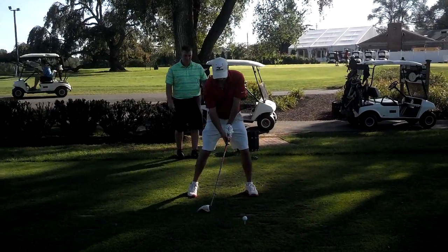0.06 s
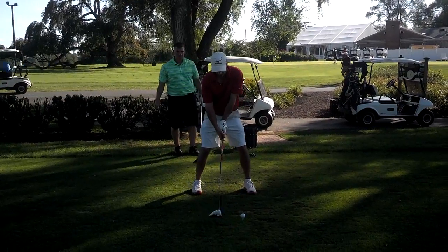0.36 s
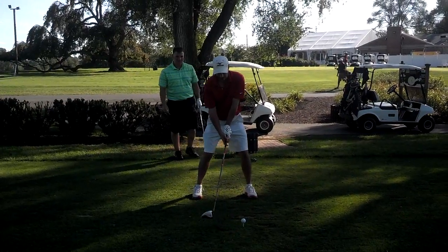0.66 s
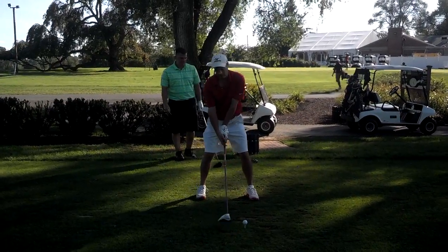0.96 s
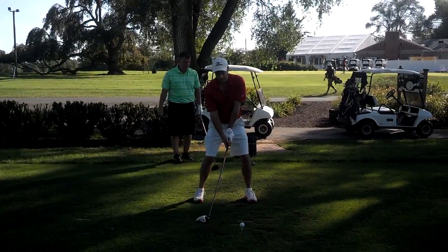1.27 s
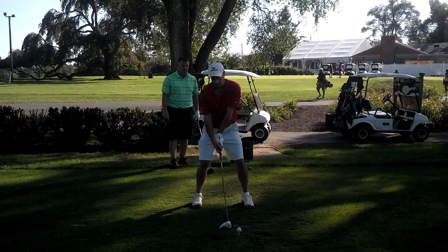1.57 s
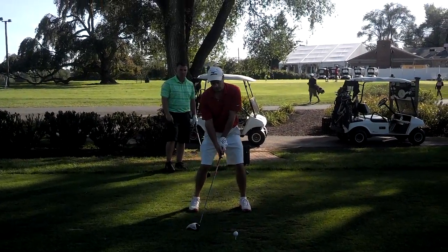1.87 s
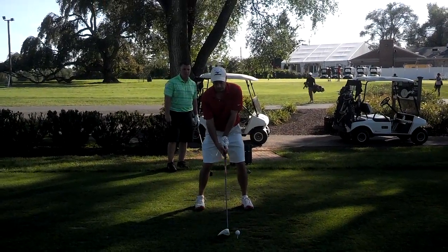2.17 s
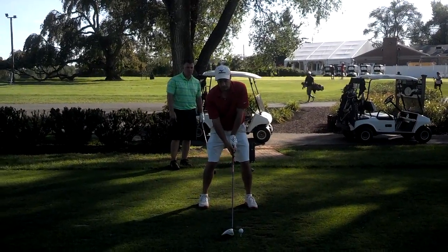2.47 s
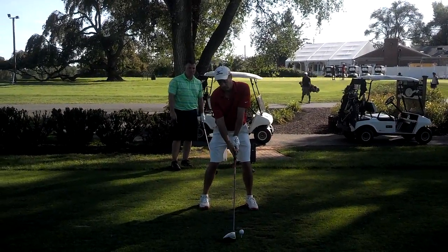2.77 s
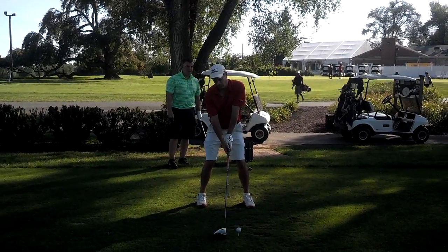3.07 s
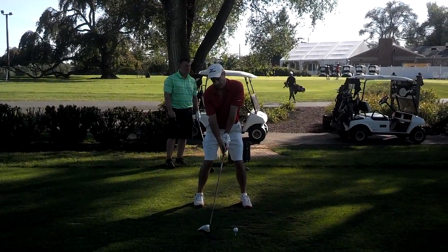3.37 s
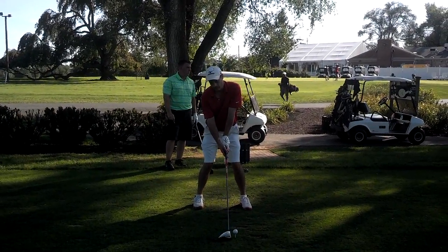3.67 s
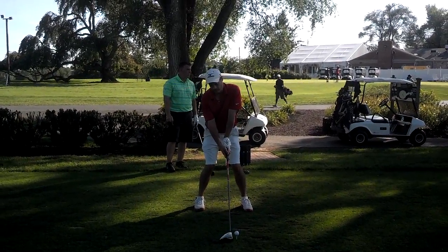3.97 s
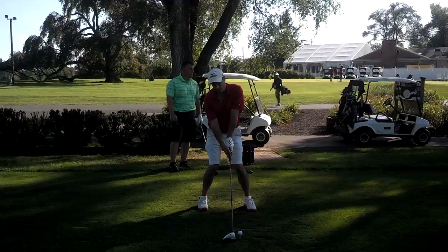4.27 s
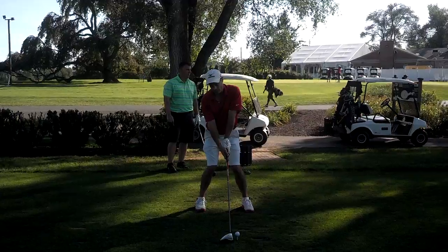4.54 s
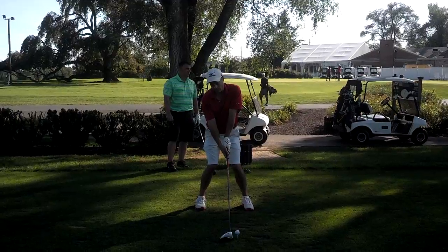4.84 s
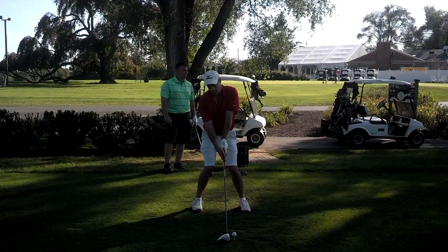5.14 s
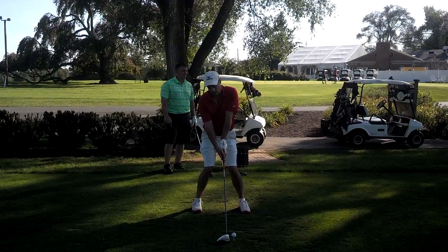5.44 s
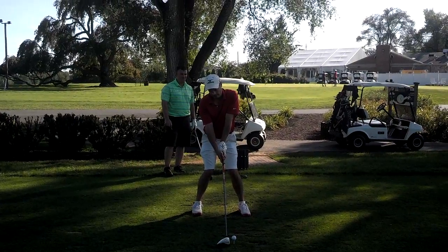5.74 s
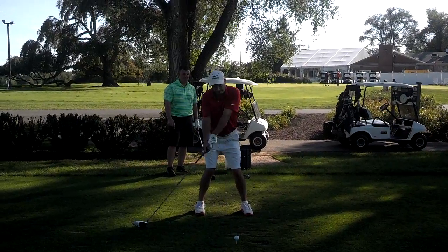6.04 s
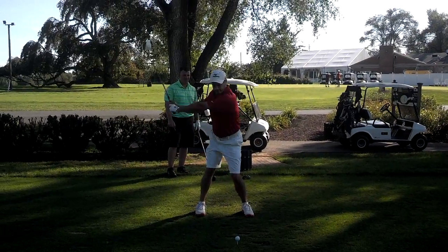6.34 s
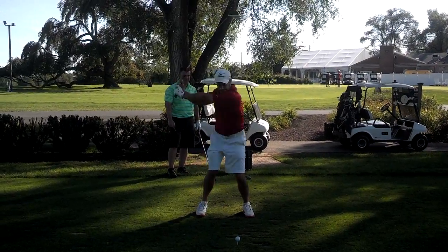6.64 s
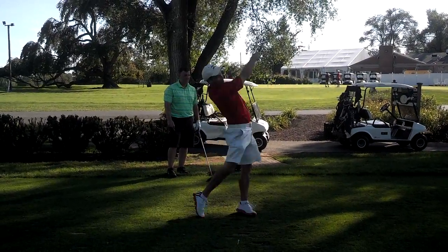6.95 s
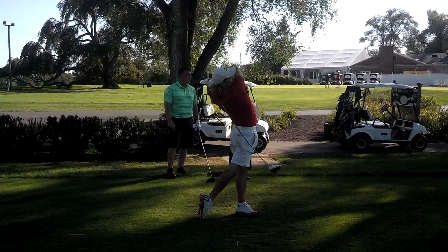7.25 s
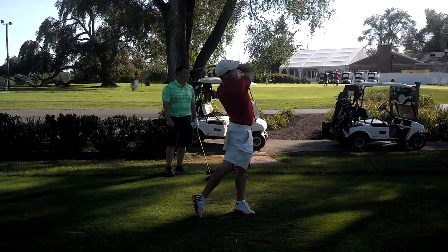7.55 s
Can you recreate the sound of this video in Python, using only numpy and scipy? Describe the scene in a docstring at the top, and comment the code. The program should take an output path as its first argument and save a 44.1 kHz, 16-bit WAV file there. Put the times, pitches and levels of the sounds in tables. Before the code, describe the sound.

Cicadas buzz over a distant mower, then a golf club whooshes and hits the ball with a loud, ringing metallic crack.

```python
"""Drive from a tree-lined tee

A golfer brushes the grass and swings: the shaft whistles, the hollow metal head cracks and rings,
and the trees answer. Cicadas buzz overhead on a bed of far roads and a droning mower, while a cart
rolls off to the left. A sharp tick, and later the strike, duck the mix, which then creeps back up."""
import sys
import numpy as np
from scipy import signal
from scipy.fft import rfft, irfft, next_fast_len
from scipy.io import wavfile
from scipy.ndimage import map_coordinates

SR = 44100
rng = np.random.default_rng(int(sys.argv[2]) if len(sys.argv) > 2 else 0)


def generate_wav(signal):
    """Clip the signal to [-1, 1] and save it as 16-bit WAV at the path in sys.argv[1]."""
    frames = np.transpose(np.atleast_2d(signal))
    scaled = np.clip(frames, -1, 1) * 32767
    pcm = np.round(scaled).astype(np.int16)
    wavfile.write(sys.argv[1], SR, pcm)


N = 335601
TIME = np.arange(N) / SR

# Road murmur, centre and sides of the image. Each row: frequency in Hz, relative level in dB.
ROADS_MID = [(25, -85), (55, -79), (78, -62), (92, -66.5), (125, -54), (200, -59), (280, -64.5),
             (430, -79.5), (680, -74.5), (1150, -82.5), (1700, -88), (2200, -83), (2850, -93), (3200, -87),
             (3800, -90), (10000, -100), (15000, -100)]
ROADS_SIDE = [(25, -103), (60, -94.5), (120, -76), (300, -90.5), (520, -81.5), (1000, -82), (1700, -82.5),
              (2200, -92.5), (2950, -94), (3450, -82.5), (10000, -103), (15000, -99)]
# The mower's tones beside its engine note. Each row: pitch in Hz, level in dB, flutters per second.
MOWER_TONES = [(149.5, -42.7, 4), (1613, -72, 5)]
# The dull roar of its blades. Each row: frequency in Hz, relative level in dB.
BLADE_ROAR = [(100, -81), (200, -66), (330, -70.5), (450, -78), (700, -93), (2000, -120)]
# The cart's tyres and drive. Each row: frequency in Hz, relative level in dB.
CART_ROLL = [(60, -96), (150, -70), (300, -71), (420, -77), (650, -71.8), (1000, -91), (1500, -84),
             (2100, -79.5), (3000, -104.5), (6000, -110)]
# Their fade as the cart leaves. Each row: time in seconds, gain in dB.
CART_FADE = [(0, .5), (3, -2.5), (4.3, -14.5), (6.3, -14.5), (7.6, -21)]
# Cicada body resonances, upper and lower. Each row: centre in Hz, half-width in Hz, relative level in dB.
HIGH_BODY = [(5770, 70, -5), (6020, 140, -5.5), (6350, 110, -10), (6655, 150, 2), (7030, 90, -1.5),
             (7555, 150, .5), (8150, 470, -5)]
LOW_BODY = [(4030, 65, -1), (4485, 105, 0), (4880, 140, 0), (5280, 130, 1)]
# The cicada's muscle, slowly tiring. Each row: time in seconds, strokes per second.
STROKE_RATE = [(0, 46.9), (1.5, 46.5), (2.6, 46.35), (4.4, 45.9), (5.4, 45.6), (6.2, 45.7), (7.6, 45.7)]
# The club touching grass. Each row: peak time in seconds, level in dB, fade in and out in seconds.
GRASS_TOUCHES = [(1.031, -46, .006), (2.5, -52, .004), (2.884, -43, .012)]
# The colour of brushed grass. Each row: frequency in Hz, relative level in dB.
GRASS_EQ = [(3000, -40), (8000, -6), (13000, 7.5), (16000, 5.5)]
# The swing's low rush of air and its bright hiss. Each row: frequency in Hz, relative level in dB.
RUSH_EQ = [(80, -12.5), (200, -3.5), (350, -1.5), (620, 9), (1000, 4.5), (1400, -7), (3000, -30)]
HISS_EQ = [(500, -25), (1000, -3), (1400, 0), (2000, -2), (2600, 3), (4000, -13), (9000, -17), (14000, -31)]
# Modes ringing from the strike: the short 2650 Hz row is the ball, the rest the hollow club head. Each row:
# pitch in Hz, relative level in dB, seconds to fall 60 dB.
STRIKE_MODES = [(1857, -6, .007), (2650, -5, .007), (3284, -20, .08), (3390, -23, .05), (3903, -21.5, .08),
                (5330, -21, .09), (5660, -15, .04), (6175, -7, .045), (6480, -12, .04), (6790, -5, .05),
                (7138, -18, .06), (7849, -20, .05), (8027, -17, .05), (8300, -22, .06), (9254, -16, .045),
                (9781, -15, .05), (10800, -26, .06), (12610, -12, .04), (14670, -25, .07), (15450, -17, .05)]
# The crack of face on ball. Each row: frequency in Hz, relative level in dB.
CRACK_EQ = [(60, -13), (300, 2), (900, 0), (1700, 0), (3000, 0), (4200, -2), (5200, 0), (6400, 3.5),
            (8200, -4), (12000, -7), (15000, -2)]
# Slaps off nearby trunks. Each row: delay in seconds, relative level in dB.
TRUNK_SLAPS = [(.021, -36), (.075, -44), (.084, -48), (.105, -49)]
# What bark reflects, and the colour of the trees' tail. Each row: frequency in Hz, relative level in dB.
BARK_EQ = [(100, -6), (2000, -4), (7000, -1), (14000, -13)]
TREE_TAIL_EQ = [(100, -6.5), (500, -2.5), (1500, -5), (4600, -4), (5400, 3.5), (7000, 1.5), (10000, -1),
                (15000, -9)]

FASTEST_S, STRIKE_S = 6.831, 6.8461  # the club reaches top speed, then meets the ball


def amp(db):
    """Decibels as a gain."""
    return 10 ** (np.asarray(db) / 20)


def unit(x):
    """x scaled to an rms of 1."""
    return x / np.sqrt(np.mean(x ** 2) + 1e-20)


def curve(rows):
    """An automation line through (seconds, value) points."""
    return np.interp(TIME, *np.transpose(rows))


def wobble(rate):
    """A smooth random curve, rate knots a second."""
    return map_coordinates(rng.standard_normal(int(N * rate / SR) + 4), [TIME * rate])


def bump(peak_s, width_s):
    """A bell-shaped envelope."""
    return np.exp(-((TIME - peak_s) / width_s) ** 2)


def dying(start, t60):
    """An envelope that opens at start and falls 60 dB in t60 seconds."""
    return (TIME >= start) * np.exp(-np.log(1000) * np.abs(TIME - start) / t60)


def phase(hz):
    """Running angle of a changing frequency."""
    return 2 * np.pi * np.cumsum(hz) / SR


def filtered(x, response):
    """x through a complex frequency response."""
    m = next_fast_len(N + SR // 2)
    return irfft(rfft(x, m) * response(np.fft.rfftfreq(m, 1 / SR)), m)[..., :N]


def coloured(x, eq):
    """x through an EQ of (Hz, dB) points on a log axis."""
    f, db = np.transpose(eq)
    return filtered(x, lambda hz: amp(np.interp(np.log(hz + 1), np.log(f), db)))


def noise(eq):
    """Noise whose density follows (Hz, dB per Hz) points."""
    return coloured(rng.standard_normal(N) * np.sqrt(SR / 2), eq)


def wide_noise(eq):
    """Separate noise left and right, each of rms 1."""
    return np.array([unit(noise(eq)) for side in range(2)])


def whirr(hz, flutter):
    """A fuzzy tone of rms 1 whose strength and phase drift, flutter times a second."""
    drift = wobble(flutter) + 1j * wobble(flutter)
    return unit(np.real(drift * np.exp(1j * phase(hz + np.zeros(N)))))


def panned(x, lead_ms):
    """Pan by arrival time: the left channel leads by lead_ms."""
    return filtered(x, lambda hz: np.exp(np.outer([1, -1], 1j * np.pi * hz * lead_ms / 1000)))


def scattered(x, t60):
    """The diffuse stereo tail that leaves and branches throw back."""
    t = np.arange(SR // 2) / SR
    tail = rng.standard_normal((2, len(t))) * np.exp(-np.log(1000) * t / t60)
    return signal.oaconvolve(x[None], tail / np.linalg.norm(tail[0]), axes=1)[:, :N]


def traffic(gain_db):
    """Far roads murmur from all around."""
    mid, side = noise(ROADS_MID), noise(ROADS_SIDE)
    return np.array([mid + side, mid - side]) * amp(gain_db + 1.1 * wobble(3))


def mower(roar_db, engine_hz=118.6):
    """An engine drone throbs against its own scattered echoes; the blades roar dully from the left."""
    direct = unit(np.sin(phase(engine_hz * (1 + .02 * wobble(20)))))
    echoes = whirr(engine_hz, flutter=16)
    engine = amp(-37.3 + .3 * TIME) * (1.05 * direct + .8 * echoes)  # slowly nearing
    tones = sum(amp(db) * whirr(hz, flutter) for hz, db, flutter in MOWER_TONES)
    blades = noise(BLADE_ROAR) * amp(roar_db)
    return panned(engine + tones, lead_ms=-.03) + panned(blades, lead_ms=.5)


def cart(nearest_s=.12, pass_s=.45, gear_hz=690):
    """The gear whirr sinks and fades as the cart passes; its tyres roll on to the left."""
    along = (TIME - nearest_s) / pass_s
    distance = np.hypot(1, along)
    hz = gear_hz * (1 - .19 * along / distance)
    first_pair = whirr(hz, flutter=230)
    second_pair = amp(-7) * whirr(1.77 * hz, flutter=320)
    gears = (first_pair + second_pair) * amp(-46) / distance ** 2
    tyres = noise(CART_ROLL) * amp(curve(CART_FADE) + .7 * wobble(6))
    return panned(tyres, lead_ms=.22) + gears


def tymbal(body, stroke, click_gap_s, swell_db, rasp, click_width_s=.00003):
    """Each muscle stroke buckles a run of ribs; their clicks ring a body that wavers as it flexes."""
    even_ribs = (stroke - .5) / curve(STROKE_RATE) / click_gap_s
    rib = even_ribs + .004 * even_ribs ** 2  # each rib follows a little sooner than the last
    from_click_s = (rib - np.round(rib)) * click_gap_s
    swell = amp(-swell_db * np.cos(2 * np.pi * stroke))
    clicks = unit(swell * np.exp(-(from_click_s / click_width_s) ** 2))
    leaf_blur = .4 * scattered(clicks, t60=.008)
    grit = rasp * unit(swell * rng.standard_normal((2, N)))
    drive = panned(clicks, lead_ms=.051) + leaf_blur + grit
    resonance = lambda hz, width: filtered(drive, lambda f: 1 / (1 + ((f - hz) / width) ** 2))
    return unit(sum(resonance(hz, width) * amp(db + 1.2 * wobble(7)) for hz, width, db in body))


def cicadas(warm_up_s=1.4):
    """Two tymbals pulse together: the upper buzz grows steadily, the lower one warms up and holds."""
    rate = curve(STROKE_RATE) * (1 + .002 * wobble(20))
    stroke = phase(rate) / (2 * np.pi) % 1
    high = tymbal(HIGH_BODY, stroke, click_gap_s=.001985, swell_db=2.9, rasp=1.45)
    low = tymbal(LOW_BODY, stroke, click_gap_s=.002232, swell_db=3.4, rasp=1.35)
    high_db = -43.3 + .5 * TIME
    low_db = -49.3 - 10 * np.exp(-TIME / warm_up_s)
    return amp(high_db) * high + amp(low_db) * low


def tick(start_s=3.08132):
    """One sharp tick, dead centre: a spike with a brief dull push behind it."""
    return -amp(14) * dying(start_s, t60=.0002) - amp(21.2) * dying(start_s, t60=.0026)


def grass_brushes():
    """The club head grazes the grass as the golfer takes aim."""
    touch = sum(amp(db) * np.exp(-np.abs(TIME - s) / fade) for s, db, fade in GRASS_TOUCHES)
    return touch * wide_noise(GRASS_EQ)


def head_whistle(pass_s=6.818, pass_hz=1700):
    """The head's thin whistle falls as it flies past."""
    hz = pass_hz * (1 - np.clip(6.5 * (TIME - pass_s), -.5, .5))
    return np.sin(phase(hz * (1 + .02 * wobble(200)))) * amp(-38.5) * bump(pass_s, width_s=.012)


def swing(whistle_hz=895, hum_hz=670, beat_hz=96):
    """Vortices shed by the shaft whistle higher as it speeds up, inside a rush of air that brightens."""
    braked = np.where(TIME < STRIKE_S, 1, .75)  # the hit takes a quarter of the speed
    speed = braked / (1 + ((TIME - FASTEST_S) / .072) ** 2)
    swell = lambda db_per_s: braked ** 3 * amp(-db_per_s * np.abs(TIME - FASTEST_S))
    flare = amp(22.5 * bump(6.8085, width_s=.016))  # the whistle's beam sweeps over the listener
    # Vortices from head and shaft beat against each other.
    beats = 1 - .48 * np.cos(2 * np.pi * beat_hz * (TIME - FASTEST_S))
    tone = unit(np.sin(phase(whistle_hz * speed * (1 + .045 * wobble(150)))))
    whistle = tone * flare * beats * amp(-36.3 + 1.5 * wobble(170)) * swell(db_per_s=330)
    head = head_whistle()
    # The thicker upper shaft hums lower.
    hum = whirr(hum_hz * speed, flutter=200) * amp(-32) * bump(6.810, width_s=.032)
    rush = unit(noise(RUSH_EQ)) * amp(-29) * swell(db_per_s=270)
    hiss = unit(noise(HISS_EQ)) * amp(-33) * swell(db_per_s=420)
    return panned(whistle + hum + head + rush + hiss, lead_ms=.068)


def strike_ring():
    """The hollow head's modes, with the ball's brief one, ring from the strike, each wandering a little in
    phase."""
    t = np.arange(SR // 4) / SR
    drift = lambda: .04 * np.cumsum(rng.standard_normal(len(t)))
    ring = sum(amp(db - 60 * t / t60) * np.sin(2 * np.pi * hz * t + drift())
               for hz, db, t60 in STRIKE_MODES)
    return np.pad(ring, (round(STRIKE_S * SR), N))[:N]


def strike(thud_hz=135):
    """The face cracks on the ball with a dull push, the head rings, and turf and trees throw it back."""
    crack = unit(noise(CRACK_EQ)) * dying(STRIKE_S, t60=.0047) * amp(30.5)
    ring = amp(15) * strike_ring()
    thud = amp(9) * dying(STRIKE_S, t60=.04) * np.sin(2 * np.pi * thud_hz * (TIME - STRIKE_S))
    turf = wide_noise(CRACK_EQ) * dying(STRIKE_S, t60=.051) * amp(3)
    slaps = sum(amp(db) * np.roll(crack, round(delay * SR)) for delay, db in TRUNK_SLAPS)
    trunks = coloured(slaps, BARK_EQ)
    trees = wide_noise(TREE_TAIL_EQ) * dying(STRIKE_S + .012, t60=.45) * amp(-19.5 + 1.5 * wobble(100))
    ring_tail = scattered(ring, t60=.4) * amp(-23)
    direct = panned(crack, lead_ms=.085) + panned(ring + thud, lead_ms=.04)
    return direct + turf + trunks + trees + ring_tail


def scene():
    """The bed of the course, with the golfer's aim, swing and strike up front."""
    far_db = .1 - .33 * TIME  # roads and blade roar slowly sink
    bed = traffic(far_db) + cart() + mower(far_db) + cicadas()
    return bed + grass_brushes() + tick() + swing() + strike()


def gain_control(x, ceiling_db, recovery_db_per_s):
    """Peaks pull the gain down at once; it climbs back at a steady rate."""
    peak_db = 20 * np.log10(np.abs(x).max(axis=0) + 1e-9)
    excess_db = np.maximum(peak_db - ceiling_db, 0)
    climb_db = recovery_db_per_s * TIME
    return x * amp(climb_db - np.maximum.accumulate(excess_db + climb_db))


def widened(x, delay_samples=16):
    """Each channel loses a delayed copy of the other, spreading the image."""
    return x - np.pad(x[::-1], ((0, 0), (delay_samples, 0)))[:, :N]


def record(dry):
    """Microphone overload, gain control, stereo widening, peak clipping and a steep high cut."""
    overload, high_cut_hz = amp(23.7), 15800
    ducked = gain_control(np.clip(dry, -overload, overload), ceiling_db=-3, recovery_db_per_s=9.3)
    clipped = np.clip(widened(ducked), -.9, .9)
    return filtered(clipped, lambda hz: 1 / np.hypot(1, (hz / high_cut_hz) ** 80))


dry = scene()
out = record(dry)
generate_wav(out)
```